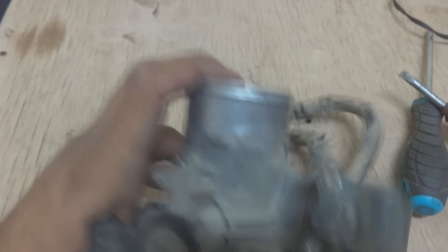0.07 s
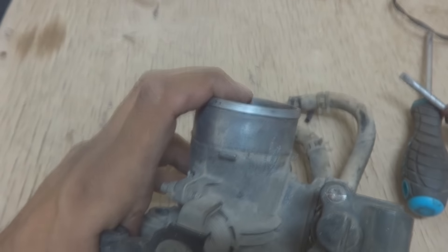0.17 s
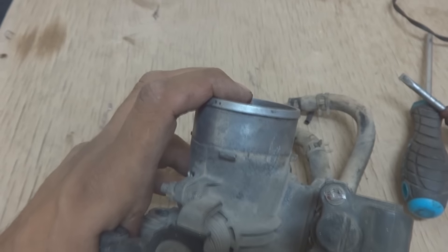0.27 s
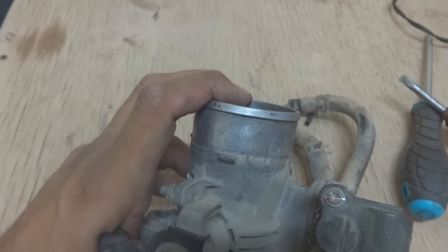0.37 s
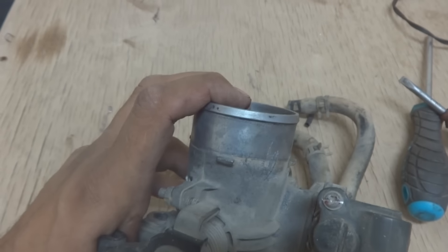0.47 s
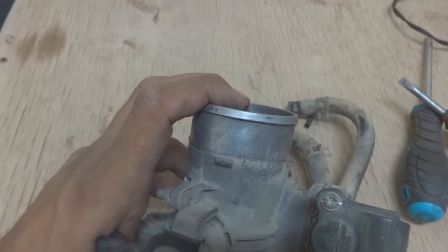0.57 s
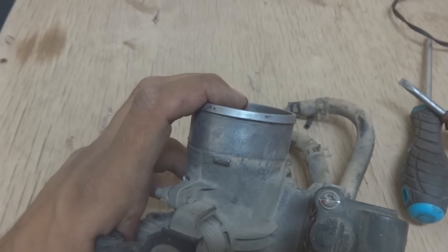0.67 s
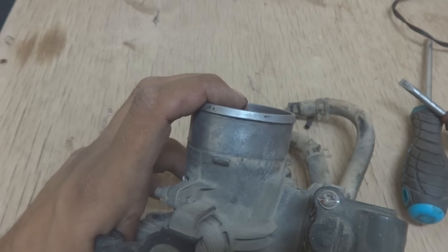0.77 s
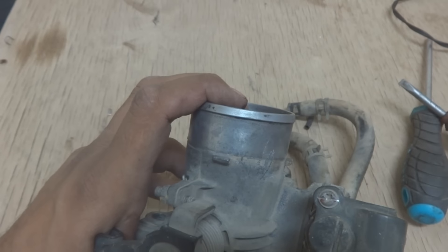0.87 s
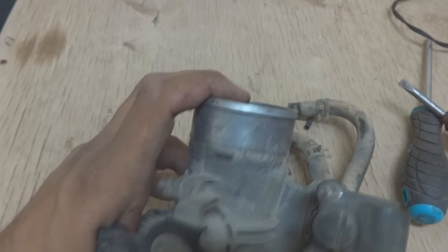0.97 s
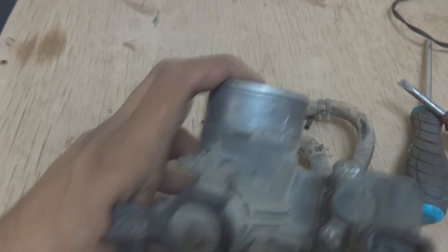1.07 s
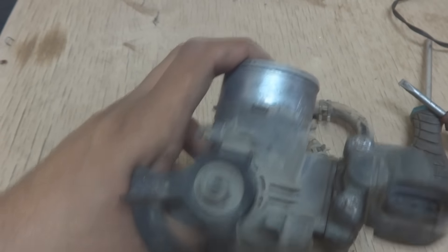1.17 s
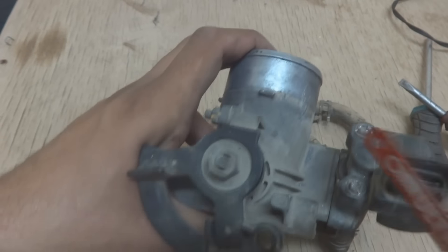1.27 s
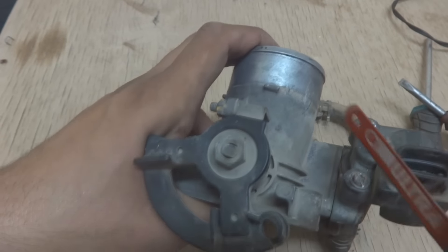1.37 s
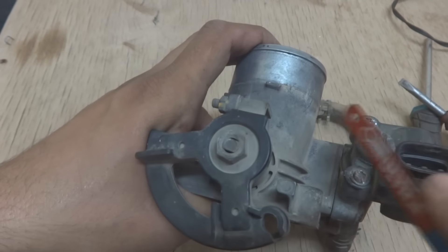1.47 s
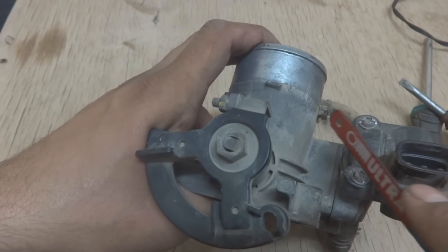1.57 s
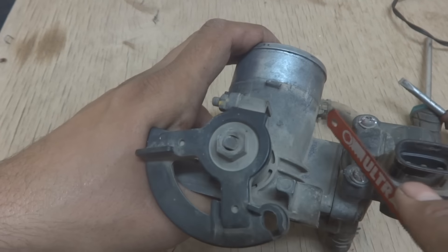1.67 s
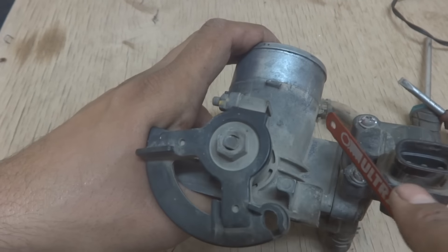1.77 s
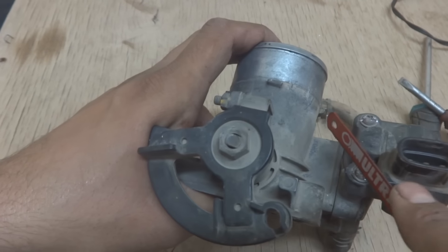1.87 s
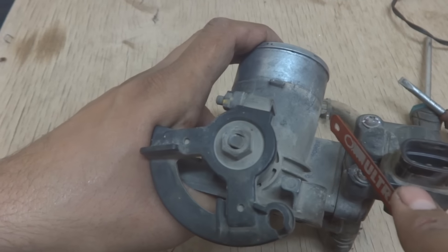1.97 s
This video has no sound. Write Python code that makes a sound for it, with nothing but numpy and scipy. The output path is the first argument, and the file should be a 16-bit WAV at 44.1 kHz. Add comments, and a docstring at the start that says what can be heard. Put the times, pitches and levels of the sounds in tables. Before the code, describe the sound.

Close up in a small, quiet room, a solid metal part thuds and rattles onto a wooden benchtop, its low boom fading quickly; later comes very soft handling rustle, light ticks and two tiny chinks over low hum.

```python
"""A heavy metal part lands on a wooden bench: short noise rattles ring the metal, soft pushes boom the wood,
and a small room answers with sparse decaying reflections.
Before and among the knocks the part scuffs over the bench, made of many tiny clicks; afterwards a hand
rustles, made the same way. Light ticks, which are noise bursts, fall in both the scuff and the rustle,
and two short pitched chinks come late in the rustle.
Shaped noise and wavering low tones make the hiss and hum of the room."""
import sys
import numpy as np
from scipy import signal
from scipy.fft import rfft, irfft
from scipy.io import wavfile
from scipy.ndimage import uniform_filter1d

SR = 44100
rng = np.random.default_rng(int(sys.argv[2]) if len(sys.argv) > 2 else 0)


def digitize_waveform(pressure):
    """Quantize a signal to 16-bit integers and store it at the path in sys.argv[1].

    Rows of a 2-D input are taken as channels; values are limited to [-1, 1].
    """
    field = np.atleast_2d(pressure).T
    bounded = np.clip(field, -1, 1)
    quanta = np.round(bounded * 32767).astype(np.int16)
    wavfile.write(sys.argv[1], SR, quanta)


def nominal_scale(level):
    """Amplitude ratio for a level in decibels (scalar or array-like)."""
    x = np.asarray(level, float) / 20
    return 10 ** x


N = 90405  # length in samples

# Room rumble and hiss. Each row: frequency in Hz, relative density in dB per Hz.
AIR_COLOUR = [(15, -14), (141, -7.5), (166, -25.5), (191, -9.5), (466, -17), (633, -22.5), (988, -24.5),
              (2040, -31.5), (15600, -48)]
# Likeness of the air at the two microphones. Each row: frequency in Hz, correlation from -1 to 1.
AIR_LIKENESS = [(60, 0.94), (180, 0.9), (550, -0.11), (1650, -0.56), (4970, 0.32), (15000, 0.94)]
# Balance of the air. Each row: frequency in Hz, left minus right in dB.
AIR_BALANCE = [(60, 0.77), (240, 1), (3770, 0.1)]
# Hum lines. Each row: frequency in Hz, relative level in dB, width of the wavering in Hz.
HUM_LINES = [(55.8, -71, 8.1), (98.5, -66.5, 7.5), (141.4, -62.5, 3.1), (246.6, -70.5, 2.5)]
# Decay of the room's main tail. Each row: frequency in Hz, t60 in seconds.
ROOM_DECAY = [(100, 0.35), (800, 0.41), (3000, 0.35), (12000, 0.45)]
# Spread of the room. Each row: frequency in Hz, unshared part relative to the shared part.
ROOM_SPREAD = [(100, 0.45), (1400, 0.85), (3000, 1), (10000, .05)]
# Hand rustle over time. Each row: time in seconds, level in dB.
RUSTLE_CURVE = [(.95, -100), (1.16, -72), (1.25, -64.5), (1.3, -59), (1.36, -61.5), (1.45, -66),
                (1.56, -68.5), (1.8, -75.5)]
# Tone of the rustle. Each row: frequency in Hz, relative level in dB.
RUSTLE_TONE = [(250, 4.5), (500, 8.5), (1500, -5), (2800, -12.5), (5200, -10.5), (8000, -17),
               (15500, -20.5)]
# Scuff over the bench. Each row: time in seconds, level in dB.
SCUFF_CURVE = [(.147, -55), (.152, -50.5), (.19, -48.5), (.21, -44.5), (.232, -40.5), (.26, -45.5),
               (.29, -44.5), (.32, -73)]
# Tone of the scuff. Each row: frequency in Hz, relative level in dB.
SCUFF_TONE = [(200, 3.5), (500, 4), (1200, -11), (2100, -4), (3300, -18), (4700, -15), (5600, -16.5),
              (7500, -23.5), (15500, -43)]
# Light noisy ticks. Each row: start in seconds, relative level in dB, decay constant in seconds.
TICK_HITS = [(0.151, -56, 0.0051), (0.1682, -57.5, 0.0033), (0.182, -60.5, 0.005), (.194, -52, .006),
             (0.229, -57.5, 0.0029), (1.189, -59, 0.0028), (1.275, -59, 0.0044), (1.319, -56, 0.0026),
             (1.6758, -51.5, 0.0054), (1.683, -60.5, 0.0028)]
# Tone of the ticks. Each row: frequency in Hz, relative level in dB.
TICK_TONE = [(600, -9.5), (1500, 1), (3300, 3), (4400, -11.5), (5600, 6), (6800, -6.5), (11000, -9.5),
             (15500, -11)]
# Short pitched chinks late in the rustle. Each row: start in seconds, level in dB, pitch in Hz.
PITCHED_CHINKS = [(1.709, -63.5, 3070), (1.782, -66, 3800)]
# Knocks of the part on the bench. Each row: start in seconds, relative rattle level in dB,
# knee of the rattle's treble in Hz, rattle decay constant in seconds, relative push level in dB.
KNOCK_HITS = [(0.205, -48, 200, 0.026, -30.5), (0.2396, -20.5, 896, 0.015, -16),
              (0.2553, -17, 1560, 0.0082, -41), (0.2603, -16.5, 1000, 0.014, -36.5),
              (0.2812, -21, 558, 0.0078, -21.5), (.301, -26, 487, 0.017, -23),
              (0.321, -28.5, 306, 0.0048, -24.5)]
# Deep bench modes. Each row: frequency in Hz, relative level in dB, t60 in seconds.
BENCH_MODES = [(67, -25, 2.1), (117.3, -5, 0.43), (142.1, -7, 0.46), (168.3, 3, 0.27), (186.96, -9, 0.86),
               (237.5, -6, 0.28)]
# Higher modes of bench and part. Each row: central frequency in Hz, relative level in dB, t60 in seconds.
METAL_MODES = [(329, 9, .2), (396, -6, 0.14), (496, 6, 0.15), (520, 2, 0.29), (604, -11.5, 0.067),
               (730, -4, 0.39), (976, 1.5, .33), (1440, -15, 1.04)]
# Tone of the direct knock. Each row: frequency in Hz, relative level in dB per Hz.
BLOW_TONE = [(30, -19), (150, -13.5), (350, 2), (600, -3.5), (950, -6.5), (1640, -21), (3000, -31),
             (6000, -45.5), (15500, -66)]
# Balance of the knocks. Each row: frequency in Hz, left minus right in dB.
KNOCK_BALANCE = [(60, 0.5), (300, 4), (1400, 2), (15000, -2)]
# Tone of the near reflection. Each row: frequency in Hz, gain in dB on top of SIDE_DB.
SIDE_TONE = [(400, -23.5), (1500, 2), (2800, -6.5), (8000, -11)]

AIR_DB, PATCH_DB = -56.5, 0.4  # rms of rumble and hiss before balance; rms of the patches' level shifts
LATE_DB, LATE_STRETCH = -16.5, 2.8  # a weaker second tail that lasts longer
GRAINS_PER_S = 3500  # average click rate of scuff and rustle
RUSTLE_SPREAD_DB, SCUFF_SPREAD_DB = 2.3, 2.8  # unevenness of the clicks
CHINK_S, TICK_ROOM_DB = 0.0054, -11.5  # chink length; room send of the light sounds
RISE_S = 0.0004  # onset of every rattle
PUSH_CYCLES = 1.12  # push length in periods of the knee: a dull knock pushes longer
METAL_SPLIT = 0.05  # largest detuning of a partial in a cluster, as a share of its pitch
MODES_DB, DIRECT_DB, BENCH_DB = -9, 4, 13.5  # gains of metal modes, direct knock and bench boom
ROOM_DB, BOOM_ROOM_DB = -7, -7.5  # room sends of knock and boom
DAMP_S, DAMP_DB_PER_S = 0.52, -130  # from here the boom dies faster, by this extra slope
RING_HZ, RING_S, RING_DB, RING_T60 = 6750, 0.285, -62, 0.35  # faint high ring: pitch, start, level, t60
SIDE_S, SIDE_DB = 0.00208, -7  # delay and common gain of the near reflection
MIC_LOW_HZ = 51


def evened(x):
    """Brings a sound to an rms of one."""
    return x / np.sqrt(np.mean(x ** 2) + 1e-30)


def read(points, hz):
    """Reads a curve at any frequency, interpolating along log frequency."""
    f, value = np.transpose(points)
    return np.interp(np.log(hz + 1), np.log(f + 1), value)


def add(mix, s, sound):
    """Lays a sound into the mix at s seconds, cut at the end."""
    part = mix[round(s * SR):][:len(sound)]
    part += sound[:len(part)]


def coloured(x, points):
    """Causal minimum-phase filter of unit energy with the given spectrum."""
    hz = abs(np.fft.fftfreq(8192, 1 / SR))
    log_gain = np.log(nominal_scale(np.maximum(read(points, hz), -100)))
    phase = -signal.hilbert(log_gain).imag
    taps = np.fft.ifft(np.exp(log_gain + 1j * phase)).real[:4096]
    return signal.oaconvolve(x, taps / np.linalg.norm(taps))[:N]


def panned(x, points):
    """Sets the balance of two microphones by frequency."""
    half = read(points, np.fft.rfftfreq(N, 1 / SR)) / 2
    return irfft(rfft(x) * nominal_scale([half, -half]), N)


def rattle(db, seconds):
    """A burst of noise that rises quickly and dies away."""
    t = np.arange(4000) / SR
    envelope = np.exp(-t / seconds) * np.minimum(t / RISE_S, 1)
    return nominal_scale(db) * rng.standard_normal(len(t)) * envelope


def ringing(force, modes, split=0):
    """The force passes a set of dying modes of unit total energy; split modes beat unevenly."""
    t = np.arange(SR) / SR
    detune = 1 + split * rng.uniform(-1, 1, (len(modes), 4, 1))  # four partials per mode
    ring = np.zeros(SR)
    for k, (hz, db, t60) in enumerate(modes):
        partials = np.sin(2 * np.pi * hz * detune[k] * t).sum(0)
        ring += (-1) ** k * nominal_scale(db - 60 * t / t60) * partials
    return signal.fftconvolve(force, ring / np.linalg.norm(ring))[:N]


def room(x):
    """Sparse reflections of random sign, each band dying at its own speed, partly different at each microphone."""
    taps = np.zeros((3, SR))  # one shared pattern, then one for each microphone
    at = np.arange(200, SR - 20, 20) + rng.integers(0, 20, (3, (SR - 201) // 20))
    np.put_along_axis(taps, at, rng.choice([-1., 1.], at.shape), 1)
    hz, t, z = signal.stft(taps, SR, nperseg=512)
    apart = read(ROOM_SPREAD, hz)[:, None]
    z = (z[0] + apart * z[1:]) / np.sqrt(1 + apart ** 2)
    fall_db = -60 * t / read(ROOM_DECAY, hz)[:, None]
    z = z * (nominal_scale(fall_db) + nominal_scale(LATE_DB + fall_db / LATE_STRETCH))
    tail = signal.istft(z, SR, nperseg=512)[1]
    return signal.fftconvolve(x[None], tail / np.linalg.norm(tail[0]), axes=1)[:, :N]


def hum():
    """Low tones whose strength and phase waver like narrow noise around a steady part."""
    out = np.zeros(N)
    for line_hz, db, width_hz in HUM_LINES:
        r = np.exp(-np.pi * width_hz / SR)
        drift = signal.lfilter([1], [1, -r], rng.standard_normal((2, 2 * N)))[:, N:]
        drift = drift / drift.std()
        turn = 2 * np.pi * line_hz * np.arange(N) / SR
        out += nominal_scale(db) * ((1.18 + drift[0]) * np.cos(turn) + drift[1] * np.sin(turn))
    return out


def air():
    """Room rumble and hiss: shaped noise with faint patches, partly alike at both microphones, plus the hum."""
    frames, hz = N // 512 + 5, np.fft.rfftfreq(2048, 1 / SR)
    a, b, c, d, patches = rng.standard_normal((frames, 1025, 5)).T
    patches = uniform_filter1d(patches, size=20, axis=0)
    patches = evened(uniform_filter1d(patches, size=6, axis=1))
    same = np.clip(read(AIR_LIKENESS, hz), -1, 1)[:, None]
    left = a + 1j * b
    right = same * left + np.sqrt(1 - same ** 2) * (c + 1j * d)
    z = np.array([left, right]) * nominal_scale(read(AIR_COLOUR, hz)[:, None] + PATCH_DB * patches)
    noise = signal.istft(z, nperseg=2048, noverlap=1536)[1][:, :N]
    return panned(nominal_scale(AIR_DB) * evened(noise) + hum(), AIR_BALANCE)


def friction(curve, colour, spread_db):
    """Scuff or rustle: many tiny clicks of uneven size under a level curve."""
    size = nominal_scale(spread_db * np.minimum(rng.exponential(1, N), 5)) * rng.standard_normal(N)
    clicks = size * (rng.random(N) < GRAINS_PER_S / SR)
    s, db = np.transpose(curve)
    level_db = np.interp(np.arange(N) / SR, s, db, left=-120, right=-120)
    return evened(coloured(clicks, colour)) * nominal_scale(level_db)


def ticks():
    """Light touches: coloured noise bursts, and short sines that swell and fade as pitched chinks."""
    force = np.zeros(N)
    for s, db, seconds in TICK_HITS:
        add(force, s, rattle(db, seconds))
    out = coloured(force, TICK_TONE)
    t = np.arange(0, CHINK_S, 1 / SR)
    for s, db, hz in PITCHED_CHINKS:
        add(out, s, nominal_scale(db) * np.hanning(len(t)) * np.sin(2 * np.pi * hz * t))
    return out


def near_reflection(knock):
    """A delayed, coloured copy that reaches the two microphones with opposite sign."""
    gain_db = SIDE_DB + read(SIDE_TONE, np.fft.rfftfreq(N, 1 / SR))
    side = irfft(rfft(np.roll(knock, round(SIDE_S * SR))) * nominal_scale(gain_db), N)
    return side * np.array([[1], [-1]])


def knocks():
    """Each knock is a soft push that booms in the bench and a short rattle that rings the higher modes."""
    force, push = np.zeros(N), np.zeros(N)
    for s, db, knee_hz, seconds, push_db in KNOCK_HITS:
        r = np.exp(-2 * np.pi * knee_hz / SR)
        dull = signal.lfilter([1 - r], [1, -r], rattle(db, seconds))
        add(force, s, dull * np.sqrt(1000 / knee_hz))  # lower knees get more gain
        shape = np.hanning(round(PUSH_CYCLES / knee_hz * SR) + 2)
        add(push, s, -nominal_scale(push_db) * shape / np.linalg.norm(shape))
    bright = signal.lfilter([1, -0.87], [0.13], force)  # lifts the treble
    metal = nominal_scale(MODES_DB) * ringing(bright, METAL_MODES, METAL_SPLIT)
    knock = metal + nominal_scale(DIRECT_DB) * coloured(bright, BLOW_TONE)
    t = np.arange(N) / SR
    boom = nominal_scale(BENCH_DB) * ringing(push, BENCH_MODES)
    boom = boom * nominal_scale(DAMP_DB_PER_S * np.maximum(t - DAMP_S, 0))
    ring_level = (t > RING_S) * nominal_scale(RING_DB - 60 * (t - RING_S) / RING_T60)
    ring = ring_level * np.sin(2 * np.pi * RING_HZ * t)
    wet = room(nominal_scale(ROOM_DB) * knock + nominal_scale(BOOM_ROOM_DB) * boom)
    return panned(knock + boom + ring + wet, KNOCK_BALANCE) + near_reflection(knock)


def scene():
    """All sources at the two microphones."""
    scuff = friction(SCUFF_CURVE, SCUFF_TONE, SCUFF_SPREAD_DB)
    touches = ticks()
    rustle = friction(RUSTLE_CURVE, RUSTLE_TONE, RUSTLE_SPREAD_DB)
    light = scuff + touches + rustle
    return knocks() + light + nominal_scale(TICK_ROOM_DB) * room(light) + air()


def low_pass(x):
    """Removes everything above the highest recorded frequency."""
    return signal.sosfilt(signal.butter(12, 15720, fs=SR, output="sos"), x)


def record(dry):
    """The microphone loses the deepest bass through a second-order high-pass."""
    mix = signal.lfilter(*signal.butter(2, MIC_LOW_HZ, "high", fs=SR), dry)
    return low_pass(mix)


dry = scene()
out = record(dry)
digitize_waveform(out)
```